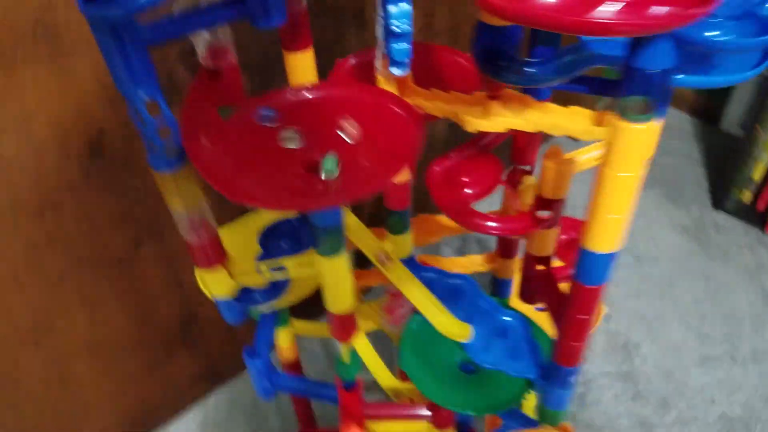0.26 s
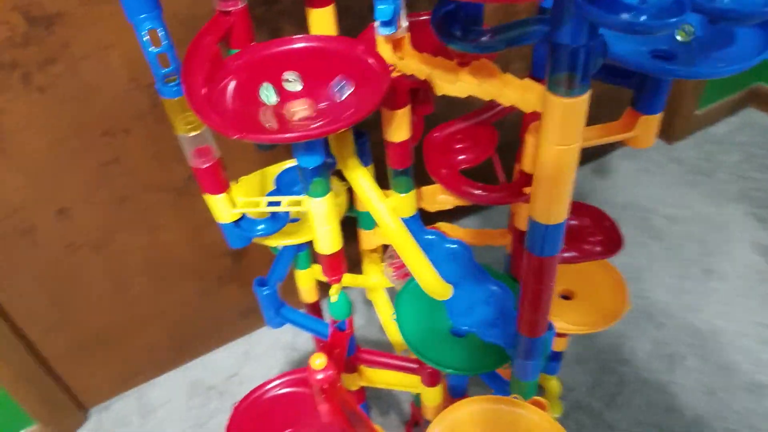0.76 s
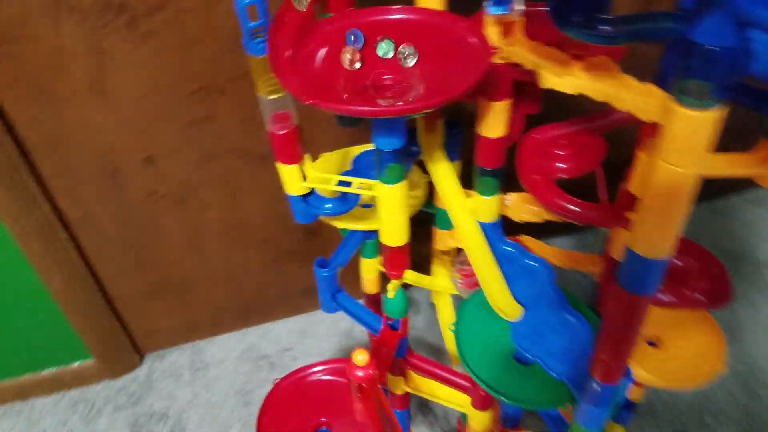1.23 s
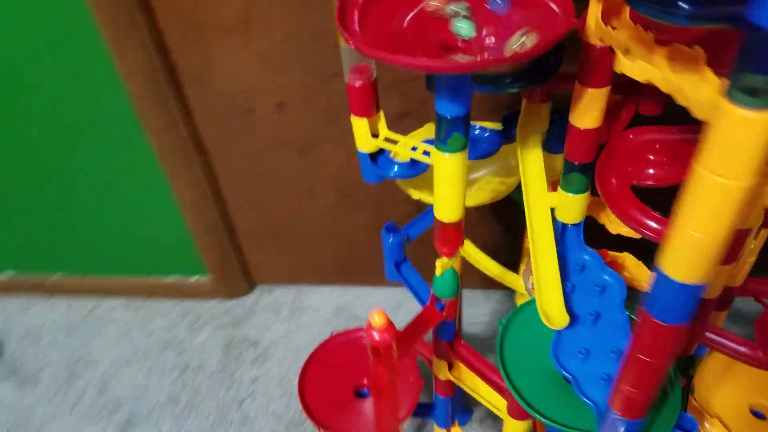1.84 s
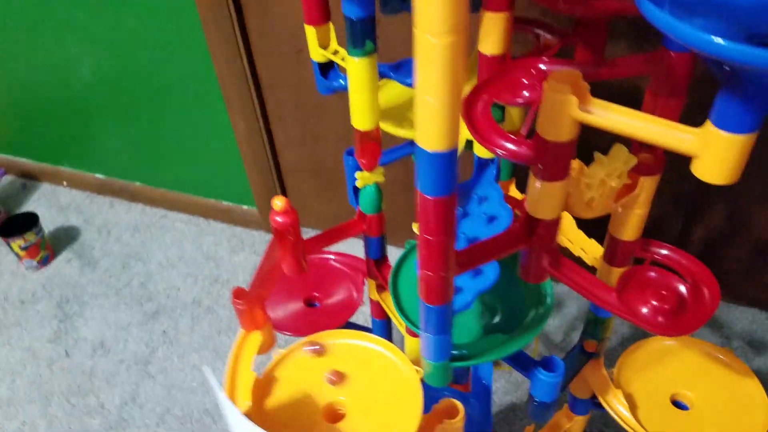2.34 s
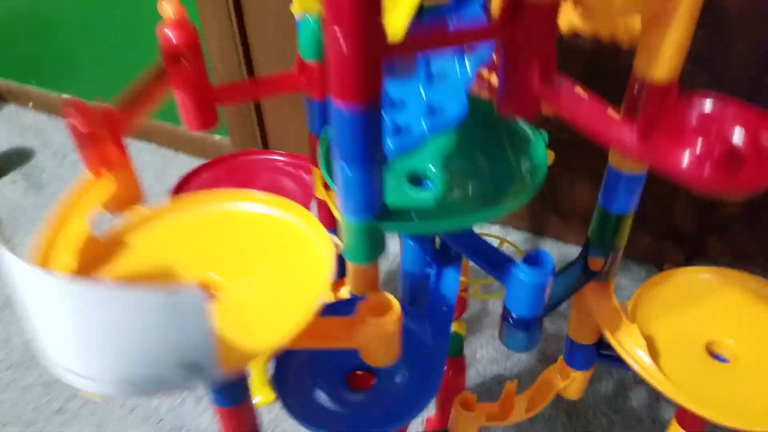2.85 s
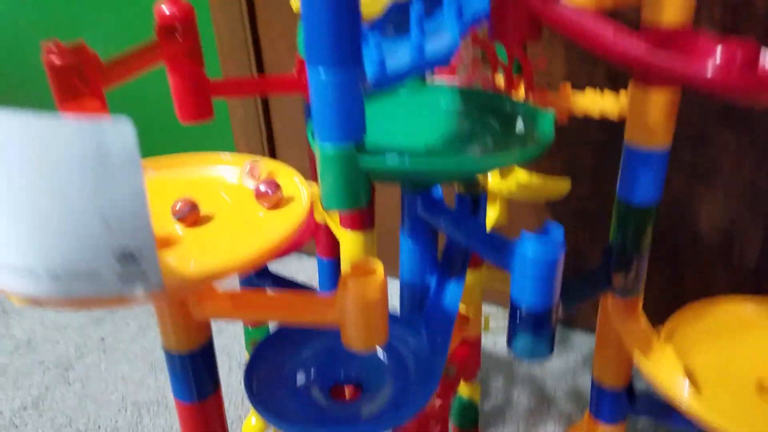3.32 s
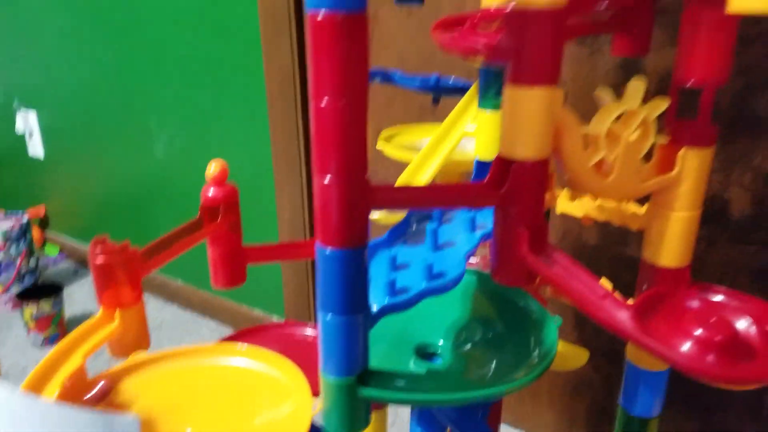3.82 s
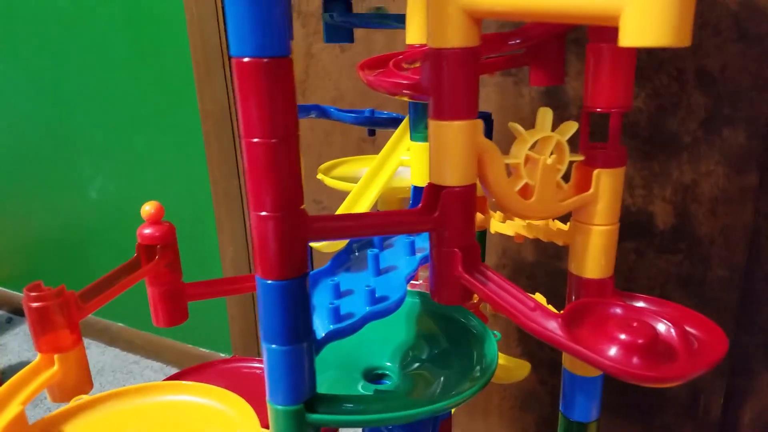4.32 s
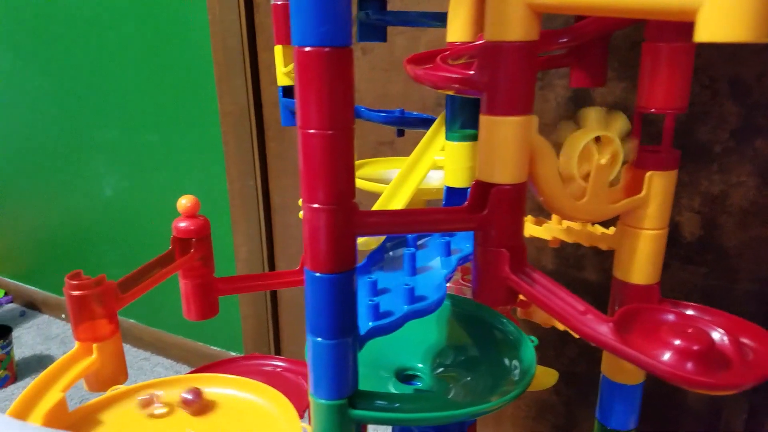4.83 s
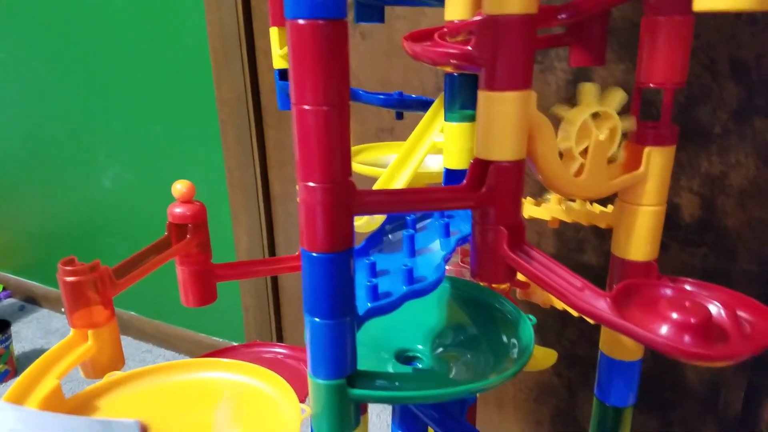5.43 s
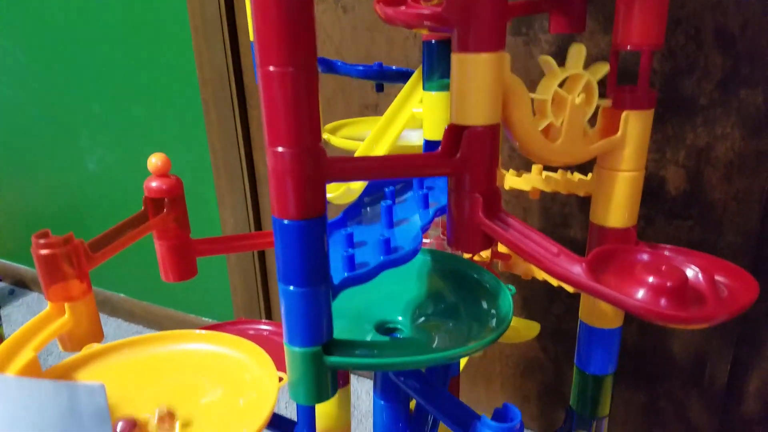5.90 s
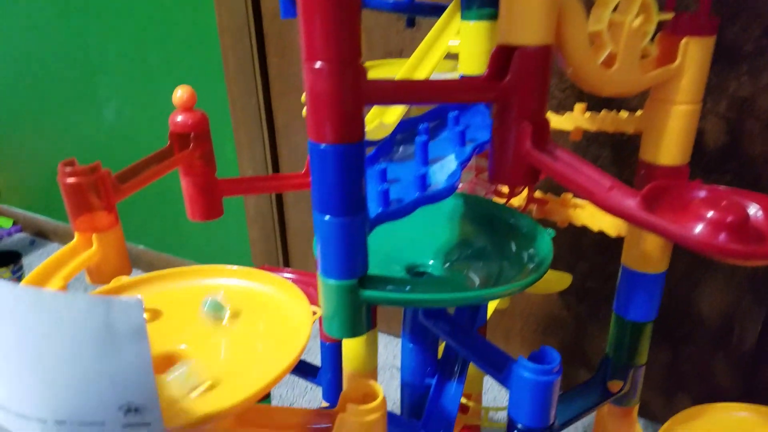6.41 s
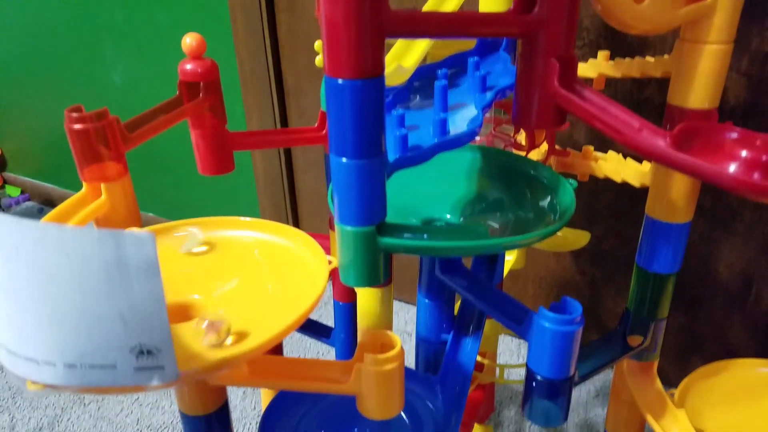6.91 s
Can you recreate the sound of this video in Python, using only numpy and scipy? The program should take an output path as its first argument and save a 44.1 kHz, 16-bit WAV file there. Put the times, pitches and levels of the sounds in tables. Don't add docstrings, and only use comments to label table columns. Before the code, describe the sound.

Close stereo sound of glass marbles in a hollow plastic track, in a small carpeted room with a short, dense tail. From 0 to 0.45 s a bright, tight rush of rattling and glass chatter with quick knocks. Until 2 s, separate hollow tocks, clinks and clacks over low rolling, with a strong knock and low push near 1.9. Around 2.3-2.5 a few clear tocks; a tiny broken axle squeak at 2.63-2.77. From 2.8 knocks thicken, with rushes at 3.0 and 3.55 and soft grip rumble near 3.2-3.6; the densest rattling is 4.0-4.9. At 5.1 a heavy drop thuds low, slightly left, then sparse taps and glass ticks, quietest near 5.9. From 6.2 strong hollow knocks return, a quick lower bowl flutter around 6.45-6.6, then rolling and spaced clacks until 7.16, still going.

```python
import sys
import numpy as np
from scipy import signal
from scipy.fft import rfft, irfft, next_fast_len
from scipy.io import wavfile

SR = 44100
rng = np.random.default_rng(int(sys.argv[2]) if len(sys.argv) > 2 else 0)


def magnitude_from_level(level_db):
    exponent = np.asarray(level_db, float) / 20
    return 10 ** exponent


def store_wav(level_fs):
    pcm = np.round(np.clip(np.atleast_2d(level_fs), -1, 1) * 32767)
    wavfile.write(sys.argv[1], SR, pcm.T.astype(np.int16))


N = 315756

# t/s, rumble level/dB
SLOW_ROLLING = [(0, -28), (.5, -38.5), (.75, -34.5), (1.38, -37.5), (1.8, -33.5), (2.05, -42), (2.22, -52),
                (2.32, -42), (2.58, -48.5), (2.8, -34), (3.2, -37.5), (3.8, -34.5), (5.2, -34.5),
                (5.44, -43), (5.85, -46), (6, -42), (6.4, -37.5), (7.16, -33.5)]
# t/s, tilt/(dB per octave)
THINNESS = [
    (0, 5),
    (.4, 3),
    (.5, 0),
    (2.8, 0),
    (3.0, 1.5),
    (3.3, 0),
    (5.8, -1),
    (6.05, 4.5),
    (7.16, 4),
]


def rms_one(x):
    return x / np.sqrt(np.mean(x ** 2) + 1e-20)


def energy_of_blow(bursts):
    return 4 * bursts / np.sqrt(np.sum(bursts ** 2, axis=-1, keepdims=True))


def in_time(rows):
    s, values = np.transpose(rows)
    return np.interp(np.arange(N) / SR, s, values)


def butter(x, hz, kind, order=2):
    return signal.sosfilt(signal.butter(order, hz, kind, fs=SR, output="sos"), x)


def ring(clicks, hz, t60):
    radius, turn = magnitude_from_level(-60 / (t60 * SR)), 2 * np.pi * hz / SR
    return signal.lfilter([0, np.sin(turn)], [1, -2 * radius * np.cos(turn), radius ** 2], clicks + 1e-18)


def dying(t, hz, db, t60):
    return (magnitude_from_level(db - 60 * t / t60) * np.sin(2 * np.pi * np.multiply(hz, t))).sum(axis=0)


def swells(s, db, fade_s, rise_share, bed_db):
    step = 64
    late = np.arange(0, N, step) / SR - np.reshape(s, (-1, 1))
    distance = np.maximum(late, -late / rise_share)
    tents = np.reshape(db, (-1, 1)) - 10 * distance / np.reshape(fade_s, (-1, 1))
    power = np.repeat((magnitude_from_level(tents) ** 2).sum(axis=0), step)[:N]
    return 10 * np.log10(power + magnitude_from_level(bed_db) ** 2)


def room_tails(count):
    # f/Hz, t60/s
    room_t60 = [(300, 0.38), (1500, 0.24), (6000, 0.14), (12000, 0.11)]
    likeness_hz, shine_db = 1000, 1
    t = np.arange(round(.22 * SR)) / SR
    shared = rng.standard_normal((count, 1, len(t)))
    own = rng.standard_normal((count, 2, len(t)))
    noise = butter(shared, likeness_hz, "low", order=1) + butter(own, likeness_hz, "high", order=1)
    below = [0 * noise]
    below += [butter(noise, hz, "low", order=1) for hz in (600, 3000, 8500)]
    below += [noise]
    tails = 0
    for low, high, (_, t60) in zip(below, below[1:], room_t60):
        tails = tails + (high - low) * magnitude_from_level(-60 * t / t60)
    tails = tails * np.clip((t - .002) / 0.0021, 0, 1)
    tails = tails / np.sqrt(np.sum(tails ** 2, axis=2, keepdims=True))
    return tails + (magnitude_from_level(shine_db) - 1) * butter(tails, 3200, "high", order=1)


def add(out, at, sound, tail, room_db, lag):
    heard = magnitude_from_level(room_db) * signal.fftconvolve(sound[None], tail, axes=1)
    heard[0, 8:8 + len(sound)] += sound
    heard[1, 8 + lag:8 + lag + len(sound)] += sound
    out[:, at:at + heard.shape[1]] += heard


def glassy(x):
    # f/Hz, level/dB
    glass = [(4000, 5.5), (7000, 2), (10000, 4.5), (13000, 8), (15500, 8)]
    hz, db = np.transpose(glass)
    length = x.shape[-1]
    size = next_fast_len(length)
    colour_db = np.interp(np.log(np.fft.rfftfreq(size, 1 / SR) + 1), np.log(hz), db)
    coloured = irfft(rfft(x, size) * magnitude_from_level(colour_db), size)[..., :length]
    return butter(coloured, 1900, "high", order=1)


def grains(per_s, spread_db):
    clumps = rms_one(butter(rng.standard_normal(N), [15, 60], "band"))
    born = rng.random(N) < per_s * magnitude_from_level(3 * clumps) / SR
    strength = magnitude_from_level(spread_db * np.minimum(rng.exponential(1, N), 3))
    return born * strength * rng.choice([-1, 1], N)


def traffic():
    # fastest moment t/s, rumble level/dB, glass chatter level/dB, time to fade by 10 dB/s
    rushes = [(.025, -15, -10, 0.0848), (.115, -23, -17, 0.06), (.18, -32, -19, 0.07),
              (.35, -21, -23, 0.06), (.41, -20, -13.5, 0.07), (.96, -32, -17, 0.06), (1.2, -34, -35, 0.07),
              (1.6, -29, -33, .12), (1.75, -35, -31, 0.07), (2.45, -37.5, -38, 0.12), (2.8, -38, -32, 0.14),
              (3.01, -22.5, -23, 0.0747), (3.3, -35.5, -35, 0.12), (3.56, -21, -12, 0.0755),
              (3.95, -29.5, -31, 0.1), (4.1, -26.5, -38, .12), (4.31, -26.5, -22, .04),
              (4.5, -20.5, -16, 0.07), (4.78, -23.5, -20, 0.1056), (4.87, -22, -15.5, 0.0661),
              (5.94, -35.5, -26, .04), (6.02, -43, -25.5, 0.06), (6.1, -36.5, -26, 0.06),
              (6.44, -37, -32, .1), (6.6, -32, -27, 0.16), (6.73, -42, -28, 0.2), (7.0, -32, -28, 0.17)]
    rise_share = 0.91
    slow_db = in_time(SLOW_ROLLING)
    s, rumble_db, chatter_db, fade_s = np.transpose(rushes)
    chatter_bed_db = 1.19 * slow_db - 3
    return (swells(s, rumble_db, fade_s, rise_share, slow_db),
            swells(s, chatter_db, 0.59 * fade_s, rise_share, chatter_bed_db))


def rolling(tails):
    # f/Hz, level/dB, t60/s
    track = [(302, -24, 0.034), (390, -34, 0.059), (531.5, -21.5, 0.094), (663, -19.5, .03),
             (775, -13, 0.032), (932.6, -17, 0.09), (1080, -13.5, 0.043), (1380, -19, 0.08),
             (1530, -6.5, 0.033), (1740, -1.5, 0.02), (2015, -11, 0.029), (2510, -7, 0.018),
             (2907, -4.5, 0.0091), (3220, -4, 0.0043), (4350, -8.5, 0.0032), (5280, -12.5, 0.0049)]
    rumble_db, chatter_db = traffic()
    contacts = grains(per_s=1300.0, spread_db=5.2)
    dealt = rng.random((len(track), N)) < .4
    tilt = magnitude_from_level(in_time(THINNESS))
    rumble = 0
    for (hz, db, t60), woken in zip(track, dealt):
        octaves = np.log2(np.clip(hz, 520, 3300) / 1700)
        rumble = rumble + magnitude_from_level(db) * ring(contacts * woken * tilt ** octaves, hz, t60)
    chatter = glassy(grains(per_s=2000.0, spread_db=4.4))
    near = magnitude_from_level(rumble_db - 5.0) * rms_one(rumble) + magnitude_from_level(chatter_db - 16) * rms_one(chatter)
    out, hop = np.zeros((2, N + SR)), 4096
    fade = np.sin(np.pi * np.arange(2 * hop) / (2 * hop)) ** 2
    near = np.pad(near, (hop, 2 * hop))
    for k, at in enumerate(range(0, N + hop, hop)):
        add(out, at, fade * near[at:at + 2 * hop], tails[7 * k % len(tails)], room_db=-4, lag=5 * k % 9 - 3)
    return out[:, hop:hop + N]


def hush():
    noise = .5 * rng.standard_normal((2, N)) + rng.standard_normal(N)
    return magnitude_from_level(-66) * rms_one(butter(noise, [55, 300], "band", order=1))


def touches():
    # t/s, peak level/dB, room share/dB
    ticks = [(0.0203, -8, -4), (0.196, -24, -6), (0.2049, -22, -4), (0.9767, -19, -4), (1.1049, -22, -3),
             (1.1827, -33, -4), (1.4232, -34, -4), (2.7377, -33, -4), (2.7541, -32, -4), (3.5593, -14, -4),
             (3.5952, -17, -4), (3.9614, -33, -4), (3.9874, -30, -4), (4.3101, -14, -4), (4.5124, -16, -4),
             (4.5625, -20, -4), (4.6089, -26, -4), (4.6874, -13, -4), (4.8404, -13, -4), (4.8726, -18, -2),
             (4.8894, -20, -2), (5.0337, -29, -5), (5.246, -17, -4), (5.5707, -18, -4), (5.7603, -34, -4),
             (5.7778, -31, -4), (5.8666, -23.5, -6), (6.0072, -33, -4), (6.0477, -33, -4), (6.0797, -23, 0),
             (6.0944, -26, -4), (6.1074, -32, -4), (6.8907, -21, -4)]
    # t/s, peak level/dB, piece ring f/Hz, room share/dB
    bounces = [(0.0074, -8, 1650, -1), (0.0344, -4, 1800, 0), (0.0844, -11, 1590, 0),
               (0.3814, -16, 1480, -3), (0.4014, -12, 1480, -1), (0.84, -14, 1380, -4),
               (1.5984, -20, 1670, -3), (2.5244, -20, 2070, -4), (2.915, -14, 1740, -1),
               (2.9844, -8, 1700, -7), (3.018, -6.5, 1550, -5), (3.5656, -11, 1930, -3),
               (3.678, -5, 1680, -2), (3.6994, -10, 1450, -2), (3.8926, -9.5, 1690, -5.5),
               (3.9689, -18, 1670, 0), (4.13, -17, 1350, -4), (4.3118, -12, 1640, -6),
               (4.4175, -7, 1630, -4), (4.477, -6, 1720, -6), (4.4896, -10, 1610, -3),
               (4.5544, -12, 1720, -3), (4.5744, -12.5, 1740, -6), (5.0814, -20, 1600, -3),
               (5.3554, -21, 2500, 0), (5.6012, -19.5, 2500, -4), (5.6735, -17.5, 1590, -5),
               (5.9284, -29, 1750, -3), (5.9589, -16, 1720, -3), (6.4478, -9.5, 2100, -7),
               (6.5926, -12, 1110, -2), (6.6006, -13, 1110, -1), (6.6192, -15, 1120, 0),
               (6.9844, -15, 2050, -3), (7.0007, -13, 1460, -1)]
    hits = [(s, db - 10.5, 2300, -7, -6, room_db) for s, db, room_db in ticks]
    hits += [(s, db - 4, hz, -11.5, -26.5, room_db) for s, db, hz, room_db in bounces]
    return hits


def knocks(hits, tails):
    t = np.arange(2500) / SR
    out = np.zeros((2, N + SR))
    chance = rng.random((len(hits), 2))
    bursts = rng.standard_normal((len(hits), 3, len(t)))
    bursts[:, 2, 0] = 3
    walls = energy_of_blow(butter(bursts[:, 0] * magnitude_from_level(-60 * t / 0.03), [1000, 2650], "band"))
    clacks = energy_of_blow(butter(bursts[:, 1] * magnitude_from_level(-60 * t / 0.024), [1950, 3650], "band"))
    cracks = energy_of_blow(glassy(bursts[:, 2] * magnitude_from_level(-60 * t / .015)))
    contact = np.clip(t / 0.0011, 0, 1)
    for k, (s, peak_db, ring_hz, clack_db, crack_db, room_db) in enumerate(hits):
        pair_hz = ring_hz * np.array([[1], [.92 + .16 * chance[k, 0]]])
        pair = dying(t, pair_hz, np.array([[-10.0], [-13.0]]), .03)
        knock = dying(t, [[2200.0]], -12.5 - room_db, 0.0038)
        knock = knock + contact * (pair + magnitude_from_level(-2.5) * walls[k])
        knock = knock + np.sqrt(contact) * magnitude_from_level(clack_db + 8.0) * clacks[k]
        knock = knock + magnitude_from_level(crack_db + 16.5) * cracks[k]
        bass_edge_hz = 533 * 2 ** (0.21 * np.interp(s, *np.transpose(THINNESS)))
        knock = magnitude_from_level(peak_db) * butter(knock, bass_edge_hz, "high")
        add(out, max(round(s * SR) - 8, 0), knock, tails[k % len(tails)], room_db,
            lag=int(chance[k, 1] * 9) - 3)
    return out[:, :N]


def hollow_rings(hits, tails):
    t = np.arange(2500) / SR
    out = np.zeros((2, N + SR))
    for k, (s, peak_db, hz) in enumerate(hits):
        levels = peak_db + np.array([[-3.0], [-19.0], [-11.0]])
        thud = dying(t, hz * np.array([[1], [.6], [1.13]]), levels, t60=0.06)
        add(out, round(s * SR), np.clip(t / .002, 0, 1) * thud, tails[-k % len(tails)], room_db=-9.5, lag=0)
    return out[:, :N]


def tocks(tails):
    # t/s, peak level/dB, ring f/Hz
    rows = [(0.0378, -8, 1800), (0.2404, -10, 1630), (0.3114, -13, 1630), (0.6794, -8, 1490),
            (1.1308, -18, 1310), (1.2614, -15, 1630), (2.3406, -13, 2070), (2.4019, -16, 1870),
            (3.3238, -9, 1740), (3.5329, -7, 1570), (3.6994, -13, 1450), (3.8975, -10, 1650),
            (4.0387, -7, 1740), (4.1634, -7, 1730), (4.2697, -7, 1640), (4.366, -7, 1740),
            (4.4448, -8, 1680), (4.4727, -5, 1730), (4.4994, -9, 1610), (4.5344, -11, 1740),
            (4.5444, -13, 1750), (4.5554, -13, 1730), (4.5754, -16, 1740), (5.1392, -16, 1520),
            (5.3143, -18, 1640), (6.2522, -11, 1740), (6.3445, -7, 1560), (6.4752, -9, 1560),
            (6.7545, -7, 1560), (6.8678, -14, 1530), (7.0274, -8, 1570)]
    return hollow_rings([(s, db - 6, hz) for s, db, hz in rows], tails)


def hands():
    # t/s, level/dB, time to fade by 10 dB/s
    shifts = [
        (.06, -50, 0.12),
        (.7, -52, .05),
        (3.21, -44, 0.05),
        (3.42, -47.5, 0.03),
        (3.62, -41, 0.05),
        (1.35, -54, 0.03),
        (1.65, -51.5, 0.05),
        (4.1, -53, 0.03),
    ]
    noise = rng.standard_normal((2, N)) + 0.78 * rng.standard_normal(N)
    tremor_db = -29.5 + 0.99 * in_time(SLOW_ROLLING)
    level_db = swells(*np.transpose(shifts), rise_share=1.0, bed_db=tremor_db)
    return magnitude_from_level(level_db) * rms_one(butter(noise, [40, 190], "band")) * magnitude_from_level([[-2.0], [2.0]])


def landings():
    # t/s, peak level/dB, piece ring f/Hz, room share/dB
    wall = [(.103, -10.5, 1710, 2.5), (0.2333, -11, 1540, 0), (.9308, -20.5, 1730, 6.5),
            (.9959, -15, 1760, -3.5), (1.2248, -23, 1600, -4), (1.5533, -13.5, 1420, -3),
            (1.6338, -9.5, 1410, -0.5), (2.8, -12.5, 1830, -3), (2.8757, -15, 1630, -3.5),
            (2.9154, -16, 1740, -2), (3.6422, -19, 1680, -17), (3.7261, -12, 1500, -4),
            (4.08, -12, 1680, -5.5), (4.286, -11.5, 1950, 5.5), (4.4233, -9.5, 1580, -3.5),
            (4.747, -11, 1600, -2), (4.8096, -7.5, 1380, 3), (4.8535, -10, 1337, 3),
            (5.9581, -15.5, 1630, -2), (6.1388, -21.5, 1120, -9), (6.2089, -14.5, 2580, -9.5),
            (6.8164, -14, 2330, -14), (6.941, -18.5, 1530, -0.5), (7.069, -15, 1630, -2)]
    ramp = [(.257, -4.5, 1740, -3), (0.3086, -6, 1640, -1), (1.1279, -15, 1338, 3),
            (1.2506, -9.5, 1590, 4.5), (1.329, -14, 1590, -1.5), (1.693, -11, 1335, -3),
            (2.339, -10.5, 2100, -5.5), (2.403, -8.5, 1875, -5), (2.5084, -17.5, 1090, -1.5),
            (2.9496, -6, 2050, 1), (3.0085, -2.5, 2570, -4), (3.5312, -11.5, 1590, 7.5),
            (3.6055, -7.5, 1706, 2), (3.674, -7, 1686, 3.5), (4.03, -8.5, 2600, -6), (4.3626, -1, 1740, -2),
            (4.4716, -2.5, 1740, 3.5), (5.7927, -21.5, 1520, -5), (6.3455, -3.5, 1690, -8),
            (6.3838, -13.5, 1900, 0.5), (6.5765, -19.5, 2030, 9.5), (6.666, -6, 1590, -3.5),
            (6.913, -8.5, 2720, -5), (7.0847, -6, 2480, -6.5)]
    hollow = [(0.5643, -27, 1900, -4), (1.504, -21, 1770, -9), (1.7827, -20, 1610, -10),
              (1.8203, -23, 1400, -1), (1.85, -26, 1290, 4), (2.1061, -10.5, 1320, -9),
              (2.4805, -16, 1930, 1), (2.7776, -28, 2200, 0), (2.9771, -6, 1790, 6.5),
              (3.065, -10.5, 2510, -2.5), (3.0964, -15.5, 1580, -3), (3.1235, -19.5, 1580, 5),
              (3.3226, -5.5, 1740, -7), (3.3466, -13.5, 1690, -12), (3.51, -4, 1840, 3),
              (3.7565, -11, 1690, -6), (4.0376, -4, 1740, -4), (4.0594, -12, 1660, -3),
              (4.1626, -5, 1706, -5), (4.4434, -4.5, 1790, -8), (4.531, -2.5, 1740, -2.5),
              (6.4181, -12.5, 1550, 0), (6.476, -2.5, 1650, -4), (6.6539, -9.5, 2055, -3)]
    pile = [(.6802, -5, 1520, 1), (1.075, -23.5, 2340, 4), (1.9131, -5.5, 1498, -1),
            (2.0012, -12.5, 1070, -7), (2.259, -29, 1950, 1), (2.6457, -35.5, 1640, 8),
            (4.6843, -10, 1330, 4), (4.7805, -19, 1290, -3), (5.136, -7, 1590, 1.5), (5.228, -12, 1480, -4),
            (5.3151, -14.5, 1670, -3), (5.4648, -28.5, 2500, -0.5), (5.6914, -14.5, 1616, -2.5),
            (5.8999, -26, 1790, 2.5), (6.466, -11.5, 1210, -20), (7.1304, -12, 2300, -7)]
    clink = [
        (.744, -9, 1444, -6),
        (.7846, -14, 1080, -10),
        (.854, -7, 1410, -8),
        (2.0268, -17.5, 1410, -11),
        (3.431, -7, 2440, -7),
        (5.06, -10, 1680, -1),
        (6.2509, -4, 1740, -3.5),
        (6.514, -6.5, 1150, -3),
        (6.536, -6, 1620, -5),
        (6.8399, -10, 2610, -4),
    ]
    kiss = [
        (0.908, -29, 1680, 3),
        (1.7739, -27.5, 1570, 1),
        (5.5331, -19, 1530, 3),
        (5.8492, -33.5, 2500, -3),
        (6.17, -23, 2620, -9.5),
        (6.252, -30.5, 1490, -2),
    ]
    lip = [
        (2.4636, -24, 2070, -4),
        (3.841, -18, 1660, -2),
        (3.8976, -10.5, 1740, -16),
        (4.2703, -7, 1630, -10),
        (6.755, -5, 1640, -11.5),
        (6.7932, -10, 2080, -3),
        (6.8683, -10, 1530, -1),
        (6.9605, -18.5, 2140, 9.5),
        (7.0277, -6, 1640, -3.5),
    ]
    # wall clack/dB, glass crack/dB
    contacts = [
        (-19, -29),
        (-11.5, -26.5),
        (-5, -23.5),
        (-10.5, -13.5),
        (-3.5, -6.5),
        (-11.5, -35),
        (-17, -24),
    ]
    kinds = zip((hollow, ramp, wall, pile, kiss, lip, clink), contacts)
    hits = []
    for rows, (clack_db, crack_db) in kinds:
        hits += [(s, db, hz, clack_db, crack_db, room_db) for s, db, hz, room_db in rows]
    return sorted(hits)


def column_and_bowl(tails):
    # t/s, peak level/dB, ring f/Hz
    thuds = [(0.307, -17, 963), (0.402, -17.5, 775), (0.467, -26, 668), (0.678, -18, 505),
             (1.252, -26, 538), (1.911, -20.5, 560), (2.947, -21, 890), (3.327, -24, 895),
             (3.436, -25, 892), (3.676, -18.5, 790), (4.162, -24.5, 733), (4.472, -21.5, 727),
             (4.679, -26, 547), (4.816, -18, 540), (5.146, -19, 508), (5.532, -26.5, 530),
             (6.867, -20.5, 890)]
    # t/s, peak level/dB, ring f/Hz
    bowl = [(2.341, -26, 1220), (2.403, -23.5, 1123), (2.4818, -24, 1196), (5.96, -29, 1100),
            (6.04, -35, 1090), (6.0858, -29.5, 1130), (6.172, -28, 1107), (6.4648, -20, 1130),
            (6.515, -18, 1120), (6.555, -24, 1110), (6.59, -21, 1120), (6.625, -24, 1100),
            (6.5342, -19, 1124), (6.5794, -23, 1230), (6.6032, -20.5, 1096)]
    return hollow_rings([*thuds, *bowl], tails)


def pushes():
    # t/s, level/dB
    falls = [
        (.680, -22),
        (.855, -30),
        (1.913, -14),
        (5.136, -12),
        (5.533, -16),
    ]
    s, db = np.transpose(falls)
    blows = np.zeros(N)
    blows[(s * SR).astype(int)] = magnitude_from_level(db + 20)
    return butter(butter(blows, [35, 380], "band", order=1), 600, "low") * magnitude_from_level([[-1.5], [1.5]])


def squeak():
    # t/s, level/dB
    slips = [
        (2.628, -46),
        (2.648, -40),
        (2.66, -38),
        (2.692, -40),
        (2.74, -41),
        (2.756, -37),
        (2.77, -43),
    ]
    level_db = swells(*np.transpose(slips), fade_s=.012, rise_share=.8, bed_db=-62.0)
    scrape = magnitude_from_level(level_db) * rng.standard_normal(N)
    return .075 * ring(scrape, 4600, .025) + .07 * ring(scrape, 3100, .025)


def scene():
    # t/s, left minus right/dB
    pan = [
        (0, -1),
        (2, -1.2),
        (4.9, -1),
        (5.1, 1.2),
        (5.9, 1.4),
        (6.1, -1.2),
    ]
    tails = room_tails(count=24)
    track = rolling(tails) + knocks(touches(), tails) + tocks(tails)
    track = track + knocks(landings(), tails) + column_and_bowl(tails) + squeak()
    pan_db = in_time(pan)
    sides = magnitude_from_level(np.array([pan_db, -pan_db]) / 2)
    return sides * butter(track, 315, "high") + hands() + pushes() + hush()


def low_pass(x):
    return signal.sosfilt(signal.butter(12, 16950, fs=SR, output="sos"), x)


def record(dry):
    heard = dry + np.array([[-.18], [.24]]) * butter(dry, [3000, 7000], "band", order=1)
    rounded = 1.318 * np.tanh(heard / 1.12)
    top_cut = signal.cheby2(12, 30, 16200, fs=SR, output="sos")
    mix = np.clip(signal.sosfilt(top_cut, rounded), -1, 1)
    return low_pass(mix)


dry = scene()
out = record(dry)
store_wav(out)
```